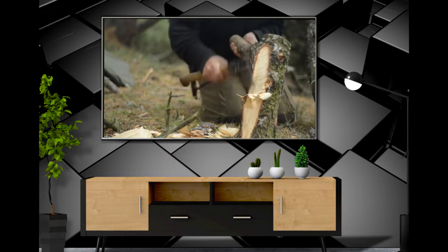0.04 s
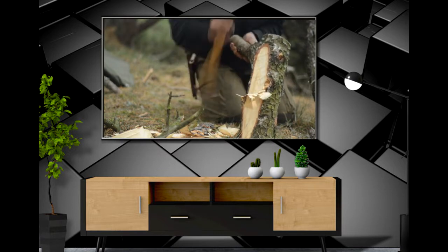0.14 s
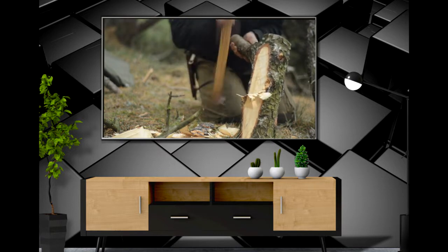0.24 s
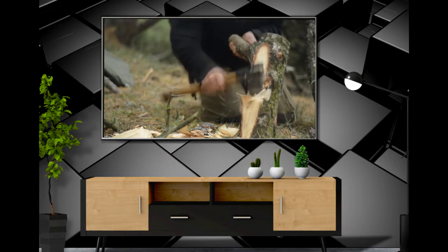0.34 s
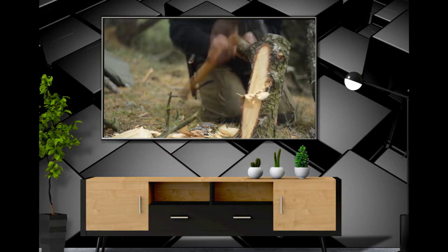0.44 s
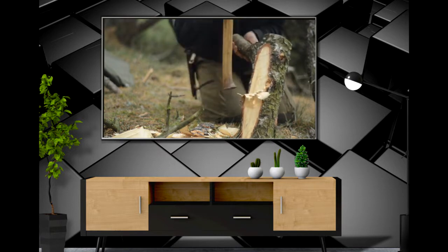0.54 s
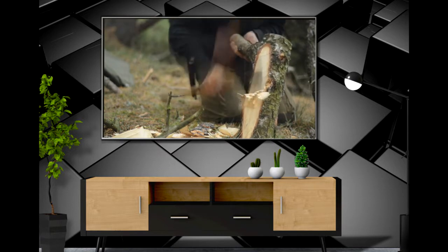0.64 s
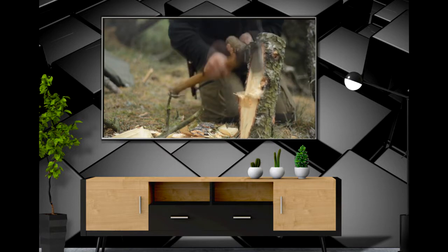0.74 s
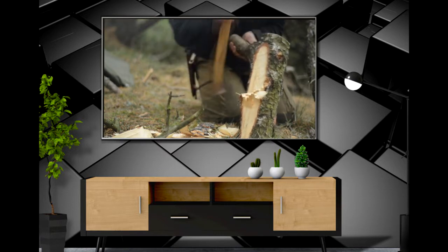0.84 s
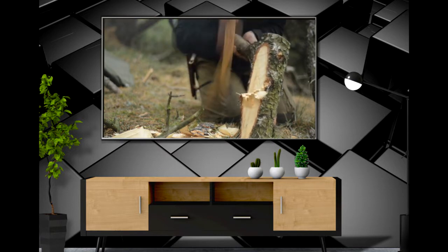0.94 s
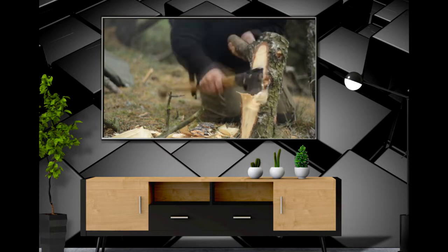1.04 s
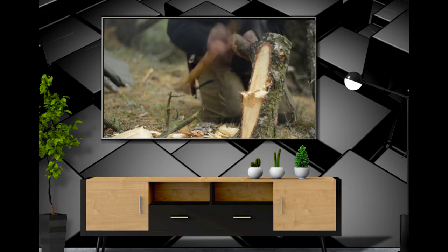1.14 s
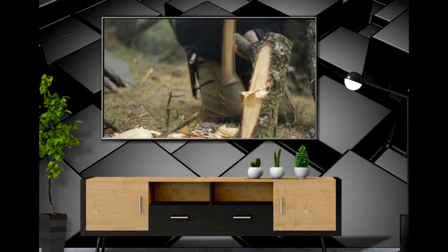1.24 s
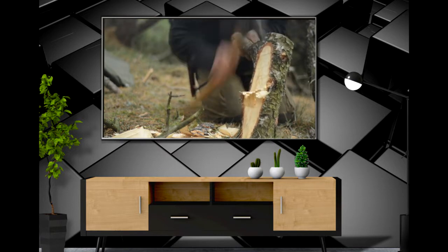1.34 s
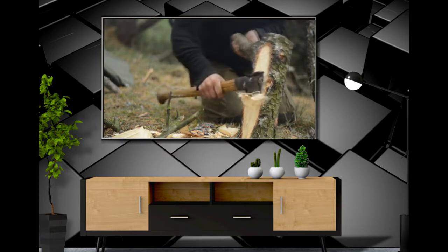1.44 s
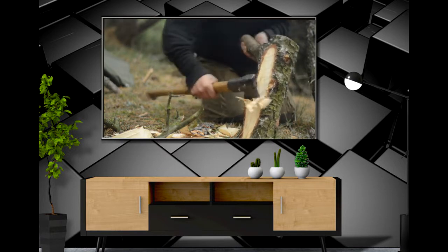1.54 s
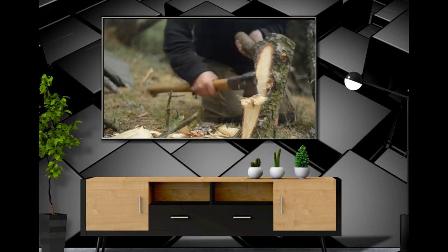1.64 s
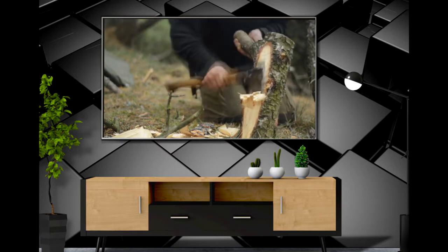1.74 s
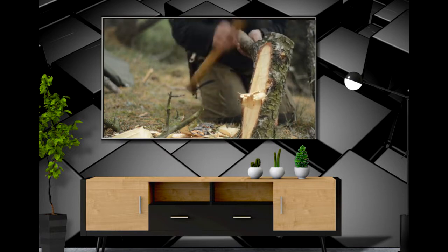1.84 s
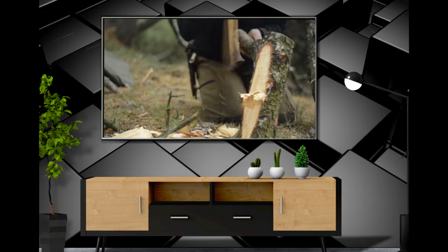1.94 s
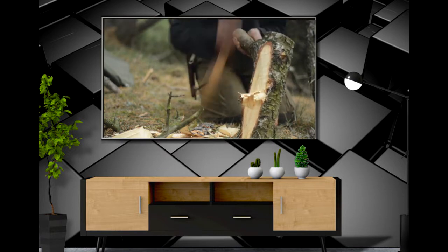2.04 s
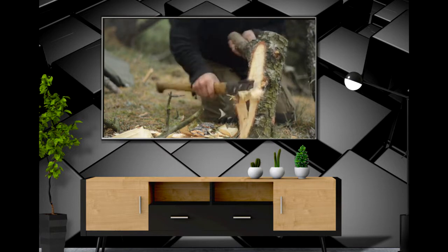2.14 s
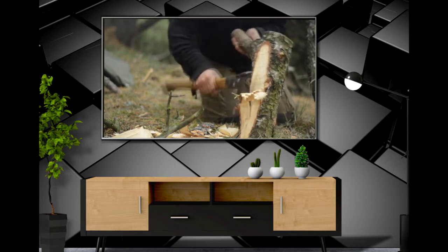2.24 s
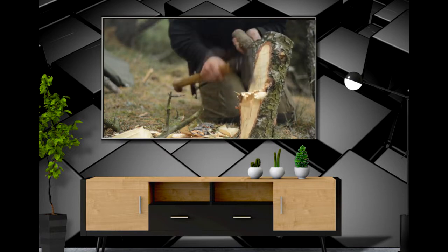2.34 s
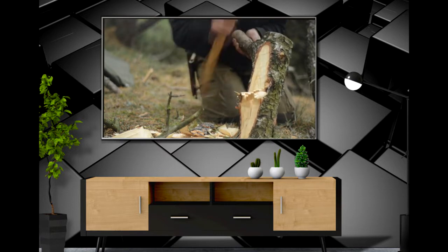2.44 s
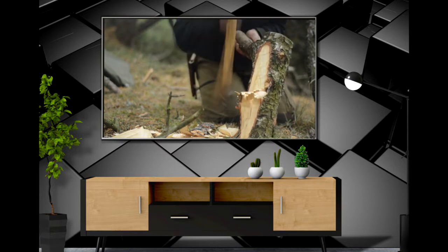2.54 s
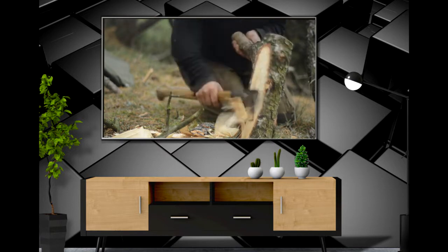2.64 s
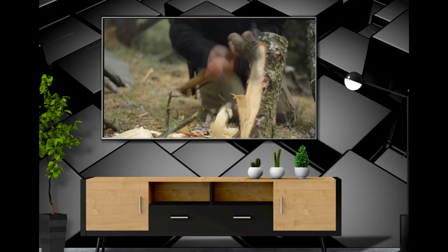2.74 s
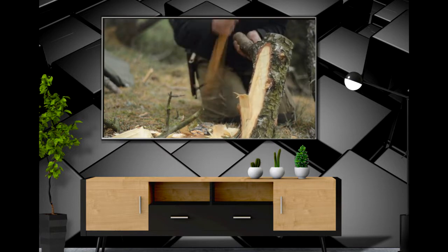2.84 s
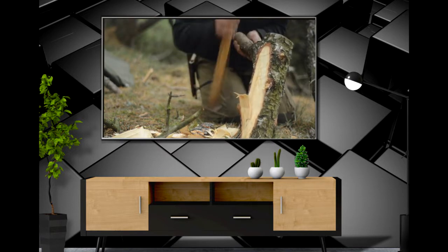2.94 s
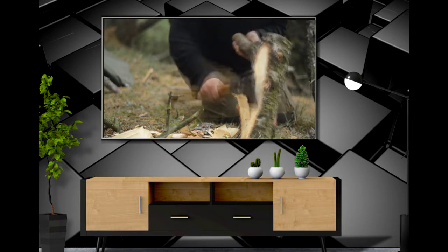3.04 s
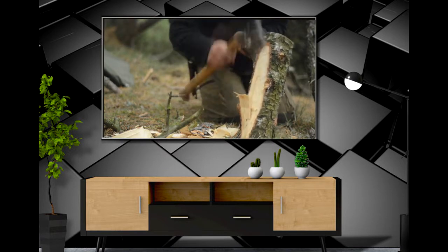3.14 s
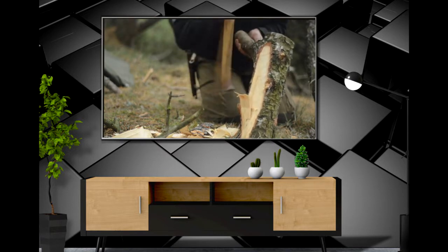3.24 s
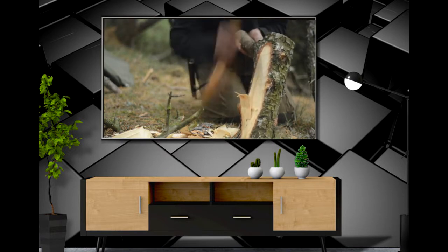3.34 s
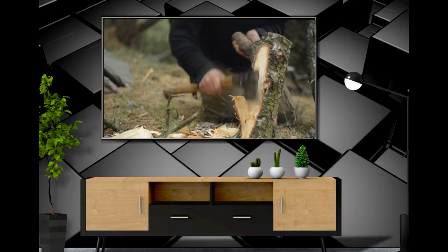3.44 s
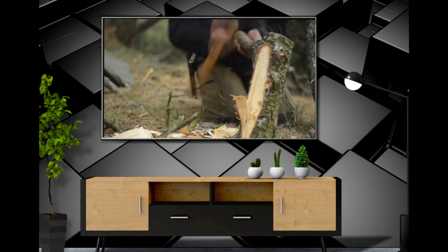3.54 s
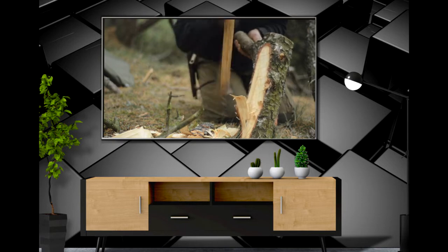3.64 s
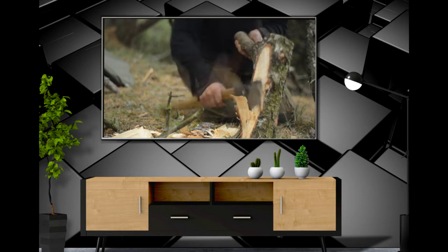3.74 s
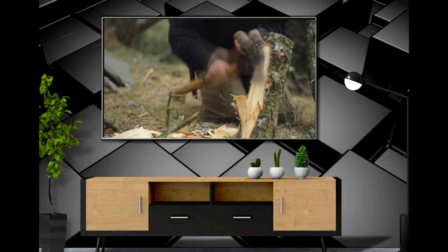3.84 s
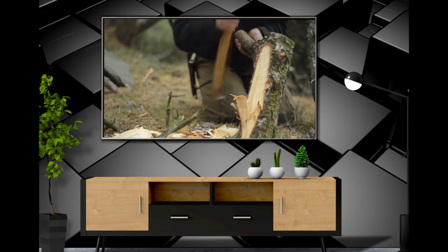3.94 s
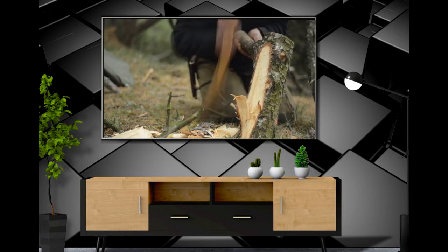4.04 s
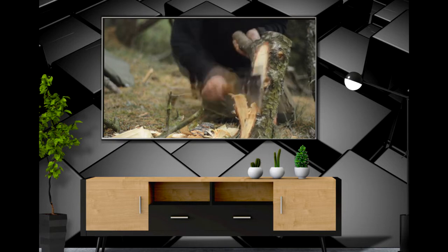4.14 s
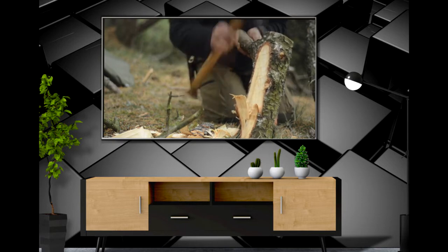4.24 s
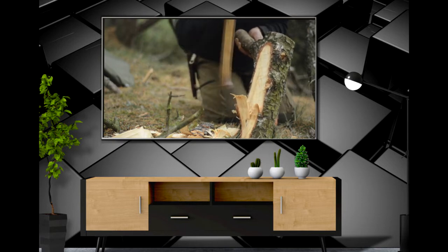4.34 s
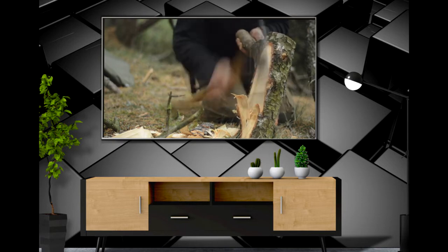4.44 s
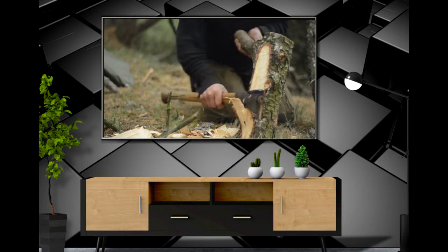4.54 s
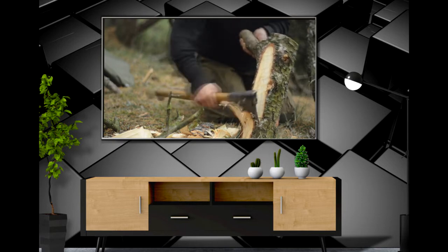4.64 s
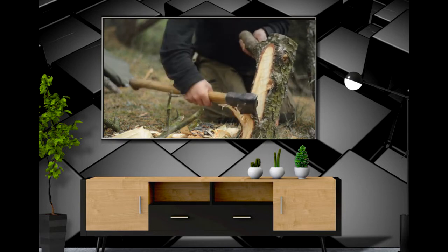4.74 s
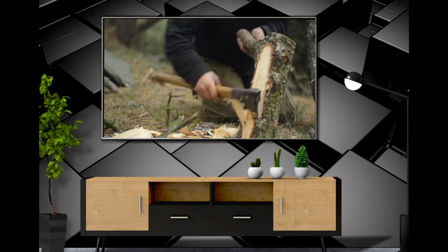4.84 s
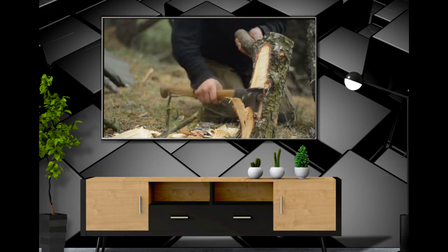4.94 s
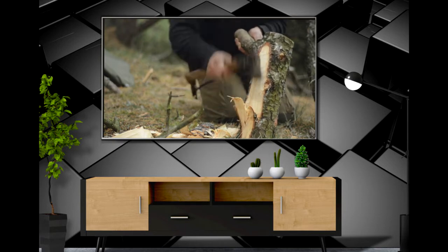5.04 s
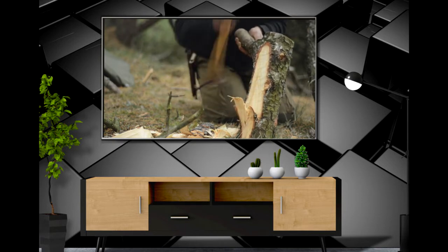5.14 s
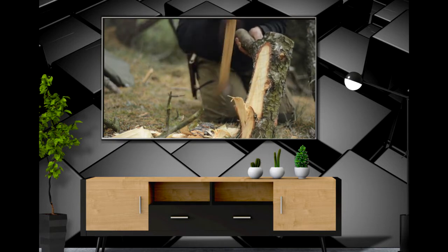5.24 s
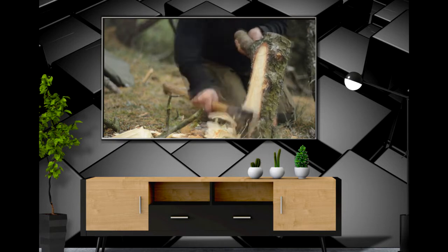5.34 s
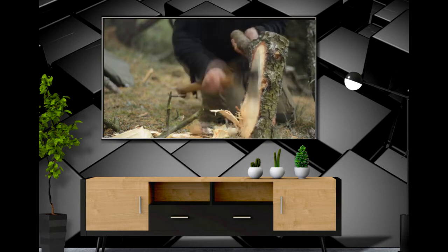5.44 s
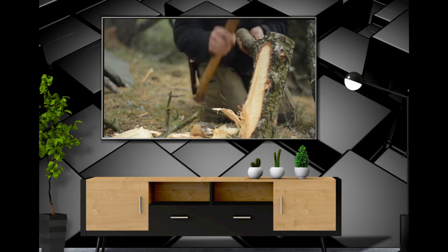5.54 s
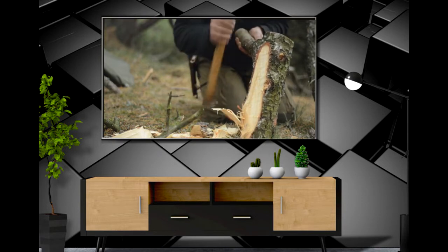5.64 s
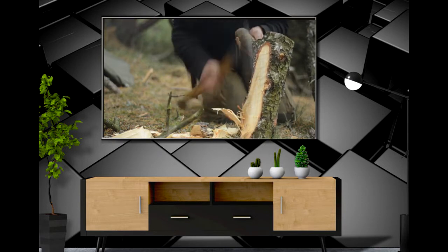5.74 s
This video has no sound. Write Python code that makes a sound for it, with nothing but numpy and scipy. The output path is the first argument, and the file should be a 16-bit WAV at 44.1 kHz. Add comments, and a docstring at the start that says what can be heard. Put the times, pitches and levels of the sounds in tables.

```python
"""A hand axe hews a standing birch log in quiet woodland: twelve blows, close to an overloading microphone.
Each blow rings the log (fading sine waves), tears its fibres (shaped noise) and shakes the ground.
The trees scatter the blows back; chips snap, bark and shavings rustle (tiny random clicks), and at the end
the axe head knocks on the log and scrubs down it. A soft hush of noise lies under all.
Blows and chips arrive twice, 8 ms apart, which sounds slightly hollow."""
import sys
import numpy as np
from scipy import signal
from scipy.fft import rfft, irfft
from scipy.io import wavfile

SR = 44100
rng = np.random.default_rng(int(sys.argv[2]) if len(sys.argv) > 2 else 0)


def bounce(signal):
    """Save signal as a 16-bit WAV file at the path given by the first command-line argument."""
    frames = np.transpose(np.atleast_2d(signal))
    limited = np.clip(frames, -1, 1)
    pcm = np.round(limited * 32767).astype(np.int16)
    wavfile.write(sys.argv[1], SR, pcm)


N = 254898  # length of the scene in samples
T = np.arange(int(.7 * SR)) / SR  # time axis of one event, s

# axe blows; split runs from a blow that the log stops dead (0) to one that slices off a slab (1);
# lead is the first arrival over the second, before the first one swells and loses its bass:
# [t/s, force/dB, split/0-1, mode pitch/ratio, ring/dB, clack/dB, tearing/dB, lead/dB]
AXE_BLOWS = [ (0.376, -4.5, 0.38, 1.016, -2.5, -10, -9.5, -10.5),
             (0.7228, 1, 0.19, 1.01, 4, -5.5, -11, 3.5), (1.064, 3, 0.23, 0.97, 6, 4, -9.5, 8.5),
             (1.4291, 0.5, 0.51, .98, 3.5, -1, -11.5, -0.5), (2.137, 1, .7, 1.07, -1, 7, -9, -1),
             (2.6862, -4, 1, 0.78, -5.5, 0.5, -9.5, -1.5), (3.0851, 2, 0.13, .96, 4.5, 5, -14.5, 14),
             (3.44, 2, 0.45, 0.97, 4, -7.5, -8.5, 12), (3.8044, -3, 0.26, 0.969, 0, -5, -11, 4),
             (4.164, -7.5, 0.2, .93, 10, -10.5, 0.5, -11.5), (4.516, -0.5, 0.68, 0.94, 3.5, -4, -7.5, -14),
             (5.3852, -0.5, 0.9, 0.94, -2.5, 2, -7, -2)]
# tone colour of torn fibres, also used for chips and rustles: [f/Hz, level/dB]
TORN_FIBRES = [(60, -39.5), (200, -3), (700, 8), (2000, -1), (3500, -4), (5000, -8), (6000, -16),
               (7800, -11), (10000, -21), (16000, -27)]


def undb(db):
    """Decibels to gain."""
    return 10 ** (np.asarray(db) / 20)


def fade(t60):
    """Exponential decay over one event: 60 dB down after t60 seconds."""
    return np.exp(-np.log(1000) * T / t60)


def unit(x):
    """Scale to an average (rms) level of 1."""
    return x / np.sqrt(np.mean(x ** 2))


def add(out, s, x):
    """Mix x into out at time s, in seconds."""
    i = max(int(s * SR), 0)
    out[i:i + len(x)] += x[:len(out) - i]


def between(ends, share):
    """A value part of the way from one end to the other."""
    return ends[0] + (ends[1] - ends[0]) * np.clip(share, 0, 1)


def at_hz(hz, points_hz, values):
    """Read a table on a log-frequency axis, where octaves are equally wide."""
    return np.interp(np.log(hz + 1e-9), np.log(points_hz), values)


def colour(x, points):
    """Shape the tone of x by (Hz, dB) points; rms 1."""
    hz = np.fft.rfftfreq(len(x), 1 / SR)
    gain = undb(at_hz(hz, *np.transpose(points)))
    return unit(irfft(rfft(x) * gain, len(x)))


def resonate(x, hz, q):
    """One resonance: a higher q rings longer and purer."""
    top_hz = .4 * SR
    hz = min(hz, top_hz)
    q = max(q, hz / top_hz)  # keeps the filter from getting too wide
    return signal.lfilter(*signal.iirpeak(hz, q, fs=SR), x)


def walk(count, rate):
    """Random levels joined by straight lines, rate of them a second."""
    knots = rng.standard_normal(400)
    return np.interp(np.arange(count) / SR * rate, np.arange(len(knots)), knots)


def crackle(spread_db):
    """Dense tiny fractures, a few much larger than the rest."""
    size = np.minimum(rng.exponential(size=len(T)), 6)
    return unit(rng.standard_normal(len(T)) * undb(spread_db * size))


def air(level_db=-57, waver_db=2.2, flicker_db=1.5):
    """Soft, dull woodland hush: it wavers as a whole and its lower bands flicker."""
    # tone colour of the hush: [f/Hz, level/dB]
    hush_colour = [(20, -0.5), (48, 2.5), (80, -9), (130, 0), (320, 0), (600, -8), (950, -14),
                   (1270, -11.5), (2000, -19), (4500, -25), (5900, -35), (8200, -34), (12500, -37),
                   (16000, -59.5)]
    hush = rfft(colour(rng.standard_normal(N), hush_colour))
    bins = np.fft.rfftfreq(N, 1 / SR)
    bands_hz = 100 * 2. ** np.arange(5)
    # overlapping bands that add up to the whole hush
    *lows, hiss = (irfft(hush * at_hz(bins, bands_hz, share), N) for share in np.eye(len(bands_hz)))
    lows = sum(band * undb(flicker_db * walk(N, rate=18)) for band in lows)
    waver = undb(level_db + waver_db * walk(N, rate=5))
    return waver * unit(lows + hiss)


def rustle(rise_s, db, hz, q=0.64, patchy_db=5.5):
    """Things scrape past each other in an uneven swell of tiny clicks that dies away slowly."""
    clicks = crackle(spread_db=3.0)
    grains = colour(resonate(resonate(clicks, hz, q), hz, q / 2), TORN_FIBRES)
    swell = T / rise_s * np.exp(1 - T / rise_s)  # reaches 1 at rise_s
    patches = undb(db + patchy_db * walk(len(T), rate=160))
    return patches * grains * swell


def rustles():
    """Each blow sprays bark, the more the deeper it slices; other rustles and scuffs come in between."""
    # shavings peeling and sliding; brief bright rustles just before two of the blows (1.402 and 4.14 s);
    # a low scuff on the soil (5.021 s) and the axe head's scrub down the log (5.419 s);
    # level is before the patchiness: [t/s, time to the peak/s, level/dB, f/Hz]
    slides = [(0.0, 0.042, -63.5, 3750), (1.402, 0.0093, -52, 3840), (1.55, 0.042, -52, 2080),
              (1.558, 0.13, -71, 6900), (2.829, 0.028, -60, 3150), (4.14, 0.0085, -49, 3450),
              (4.708, 0.029, -48, 4970), (4.866, 0.047, -56.5, 3350), (5.021, 0.028, -60.5, 226),
              (5.419, 0.021, -52, 200)]
    bark_db = (-52, -36)  # stopped dead, slicing through
    bark_delay_s, bark_rise_s, bark_hz = 0.01, 0.019, 2900  # crumbs of bark spray from every cut
    out = np.zeros(N)
    for s, rise_s, db, hz in slides:
        add(out, s, rustle(rise_s, db, hz))
    for s, force_db, split, *_ in AXE_BLOWS:
        add(out, s + bark_delay_s, rustle(bark_rise_s, between(bark_db, split) + force_db, bark_hz))
    return out


def ring(modes):
    """Sum of decaying sines, one for each way the body can vibrate."""
    return sum(undb(db) * fade(t60) * np.sin(2 * np.pi * hz * T) for hz, db, t60 in modes)


def murky_ring(hz, q, t60):
    """Noise through two narrow resonances: a cluster of close tones that beat as they fade."""
    noise = rng.standard_normal(len(T))
    return unit(resonate(resonate(noise, hz, q), hz, q)) * fade(t60)


def thin(x, low_hz=65):
    """Remove the deepest bass, so that the blow sounds thinner."""
    return signal.sosfilt(signal.butter(2, low_hz, "highpass", fs=SR, output="sos"), x)


def twice(first, second, lag_s=.00783):
    """A first arrival and, just after it, a second."""
    return first + np.pad(second, (round(lag_s * SR), 0))[:len(second)]


def overload(x):
    """Peaks near 1 are flattened; quieter sound passes almost untouched."""
    knee = 6  # higher bends more abruptly
    return x / (1 + np.abs(x) ** knee) ** (1 / knee)


def ground(rise_s=0.014, rock_delay_s=.017, earth_db=-41, earth_hz=160):
    """The log rocks a moment after the blow, and the soil rumbles briefly under it."""
    # log rocking on soft ground: [f/Hz, level/dB, t60/s]
    rocking_modes = [(44, -26, 0.14), (70, -37, 0.14)]
    rocking = ring(rocking_modes) * (1 - np.exp(-T / rise_s)) ** 2
    rocking = np.interp(T - rock_delay_s, T, rocking)  # starts later
    earth = murky_ring(earth_hz, 3, .26)
    return rocking + undb(earth_db) * earth


def woods(x, build_s=0.06, stir=0.24):
    """Diffuse, fluttering echo of trunks and ground; each pitch band dies at its own pace."""
    # scatter from the trees: [f/Hz, level/dB, t60/s]
    echo_bands = [(100, -24.5, 0.28), (408, -38, 0.91), (790, -28.5, 0.15), (1260, -21.5, 0.16),
                  (2500, -27.5, 0.43), (5000, -35.5, 1), (9000, -30.5, 0.72), (15000, -29.5, .15)]
    hz, db, t60 = np.transpose(echo_bands)
    noise = rfft(rng.standard_normal(len(T)))
    bins = np.fft.rfftfreq(len(T), 1 / SR)
    echo = 0
    for share, band_db, band_t60 in zip(np.eye(len(hz)), db, t60):
        envelope = fade(band_t60) * (1 - np.exp(-T / build_s))
        envelope = envelope / np.linalg.norm(envelope)
        band = irfft(noise * at_hz(bins, hz, share), len(T))
        echo = echo + undb(band_db) * band * envelope
    # the divisor keeps the flutter from raising the average level
    flutter = (1 + stir * walk(len(T), rate=590)) / np.hypot(1, stir * np.sqrt(2 / 3))
    return signal.fftconvolve(x, echo)[:len(T)] * flutter


def blows(drive_db=3, swell_s=0.0057, onset_share=0.15, tear_spread_db=2):
    """The blade rings the log and tears fibres while it sinks in; a slicing blow tears longer and thuds less."""
    # log with the blade in it, before each blow's pitch and colour: [f/Hz, level/dB, t60/s]
    log_modes = [(127.4, -12.5, 0.026), (297, -13.5, 0.033), (418, -8, 0.026), (526, -15, 0.044),
                 (664, -2.5, 0.016), (864.6, 1.5, 0.011), (948, -11, .025), (1173, -1.5, 0.011),
                 (1284, 2, 0.021), (1405.5, -4, 0.021), (1533, -9.5, 0.028), (1773, -3.5, 0.011),
                 (1953, -18, 0.033)]
    # where thud, hollow, knock, ring and clack lie: [f/Hz]
    colour_hz = [120, 350, 750, 1280, 2000]
    # what the split does: (stopped dead, slicing through)
    thud_db, hollow_db, knock_db = (13, -11.5), (0.5, 4), (3.5, 2)
    ground_db, tear_t60_s = (8.5, -8), (0.026, 0.067)
    # straight to the microphone, and scattered by the trees
    direct_db, echo_db = -1.5, -5
    # faint note that outlasts the blow
    note_hz, note_q, note_db, note_t60_s = 1275.5, 31, -47.5, 0.5
    note_per_lead = 0.47  # dB per dB: the note is louder when the first arrival is stronger
    first_low_hz = 182  # the first arrival carries little of the thud

    out = np.zeros(N)
    click = np.roll(signal.unit_impulse(len(T)), 64)  # a little late, to leave room for the shaping
    crack = colour(click, TORN_FIBRES)
    swell = 1 - (1 - onset_share) * np.exp(-T / swell_s)  # the first arrival grows over a few milliseconds
    for s, force_db, split, pitch, ring_db, clack_db, tear_db, lead_db in AXE_BLOWS:
        split_db = [between(ends, split) for ends in (thud_db, hollow_db, knock_db)]
        spot_db = split_db + [ring_db, clack_db]
        modes = [(hz * pitch, db + at_hz(hz, colour_hz, spot_db), t60) for hz, db, t60 in log_modes]
        log = ring(modes[::2]) - ring(modes[1::2])  # neighbouring modes swing in opposite directions
        tear_fade = fade(between(tear_t60_s, split))
        tearing = undb(tear_db) * tear_fade * colour(crackle(tear_spread_db), TORN_FIBRES)

        drive, lead = undb(drive_db + force_db), undb(lead_db)
        flat = overload(drive * (log + tearing))
        first = lead * thin(swell * flat, low_hz=first_low_hz)
        direct = thin(twice(first, flat)) / np.hypot(lead, 1)

        # among the trees the fractures merge into one crack
        echo = woods(drive * (log + tearing.std() * crack))
        note_gain = undb(note_db + force_db + ring_db + note_per_lead * lead_db)
        note = note_gain * murky_ring(note_hz, note_q, note_t60_s)
        shake = undb(between(ground_db, split)) * ground()
        add(out, s, undb(direct_db) * direct + undb(echo_db) * (echo + note) + shake)
    return out


def chip(db, hz, q, woods_db=-3, spread_db=3.0):
    """A short burst of fractures rings one splinter, or whatever else is struck."""
    second_db = -6.5  # second arrival over the first
    t60_s = 0.031 * (hz / 1000) ** -.35  # smaller, higher splinters die sooner
    burst = colour(crackle(spread_db), TORN_FIBRES) * fade(t60_s)
    snap = resonate(burst, hz, q)
    snap = undb(db) * snap / np.abs(snap).max()
    echo = undb(woods_db) * woods(snap) / max(q, 1) ** 2  # a thin, ringing splinter hardly carries
    return twice(snap, undb(second_db) * snap) + echo


def chips(scatter_db=2, scatter_octaves=.4):
    """The loud splinters, a low knock, and a small chip that lands some time after each blow."""
    # snapping splinters, larger chips landing, and the axe head's low knock on the log (5.416 s);
    # level is the peak of the first arrival: [t/s, level/dB, f/Hz, Q]
    splinters = [ (0.987, -37, 7500, 0.62), (1.5848, -31.5, 4950, 0.59), (1.8204, -38.5, 3600, 0.64),
                 (2.3706, -37, 4100, 1.24), (2.697, -5.5, 3076, 11), (2.7062, -4.5, 8000, 1.5),
                 (3.4528, -17, 7700, 2.4), (3.855, -35.5, 1826, .5), (4.071, -46.5, 2510, 0.62),
                 (4.531, -14, 7300, 1.25), (4.6967, -34, 2620, 0.76), (4.7304, -29, 7550, 3.5),
                 (4.748, -32.5, 4200, 1.27), (4.7761, -19.5, 3550, 1.86), (4.931, -27.5, 3050, 2.9),
                 (4.942, -30, 6950, 1), (5.053, -43, 5970, 1.18), (5.217, -48.5, 2530, .7),
                 (5.416, -13, 290, 3), (5.5213, -39, 3560, 1), (5.572, -40.5, 1680, 0.99)]
    # small chips land at random between these delays; typical level and pitch
    fall_s, crumb_db, crumb_hz = (0.054, 0.067), -62, 5500
    out = np.zeros(N)
    for s, db, hz, q in splinters:
        add(out, s, chip(db, hz, q))
    for s, force_db, *_ in AXE_BLOWS:
        weight, size = rng.standard_normal(2)
        db = crumb_db + force_db + scatter_db * weight
        hz = crumb_hz * 2 ** (scatter_octaves * size)
        add(out, s + between(fall_s, rng.random()), chip(db, hz, 0.89))
    return out


def scene():
    """Blows, chips and rustles over the hush, in one channel."""
    return (air() + rustles() + blows() + chips())[None]


def record(dry):
    """The recorder rounds the highest peaks and cuts the top."""
    ceiling, top_hz = .88, 15800
    rounded = ceiling * overload(dry / ceiling)
    return signal.sosfilt(signal.ellip(8, .2, 70, top_hz, fs=SR, output="sos"), rounded)


dry = scene()
out = record(dry)
bounce(out)
```